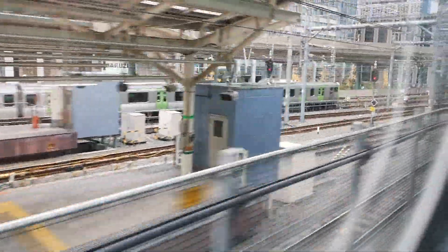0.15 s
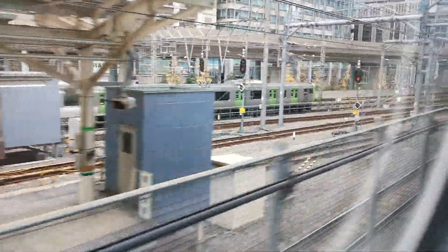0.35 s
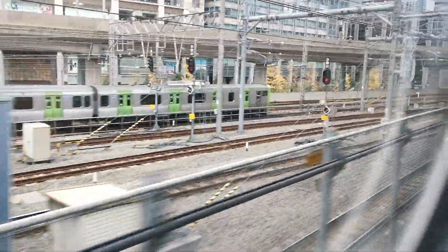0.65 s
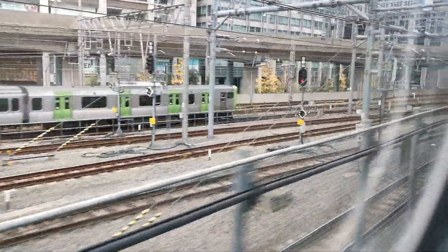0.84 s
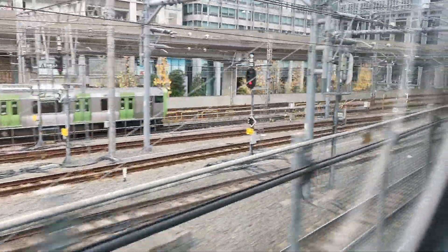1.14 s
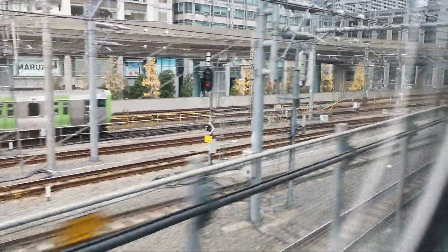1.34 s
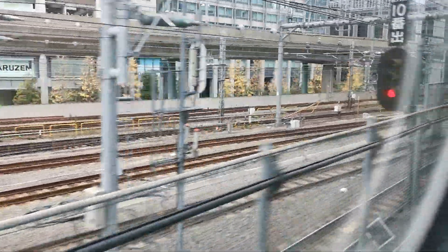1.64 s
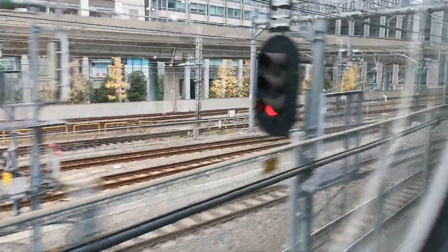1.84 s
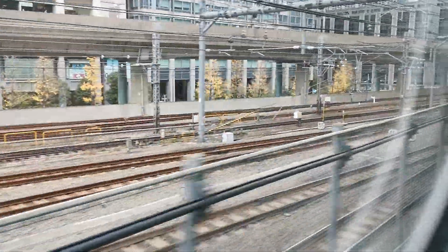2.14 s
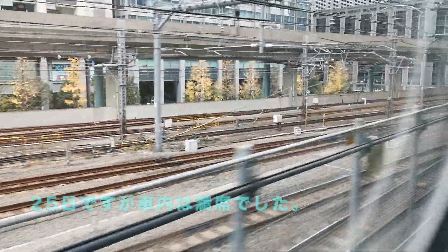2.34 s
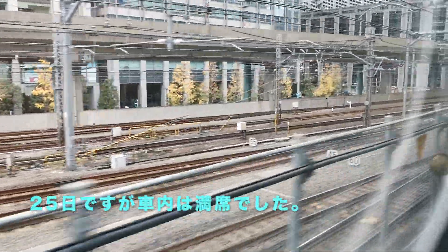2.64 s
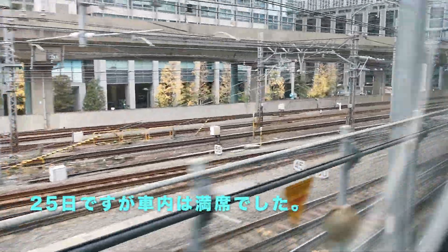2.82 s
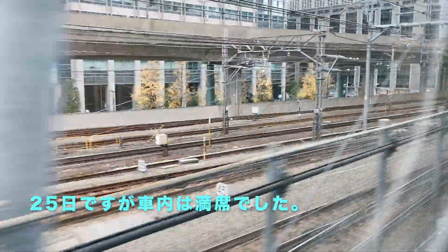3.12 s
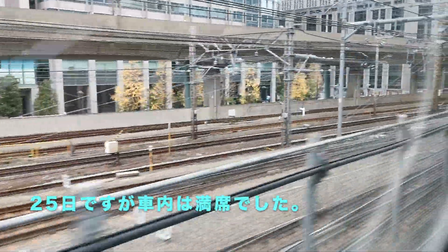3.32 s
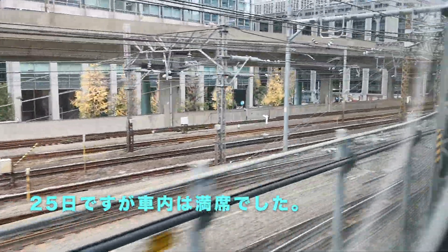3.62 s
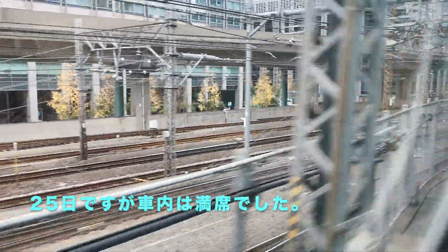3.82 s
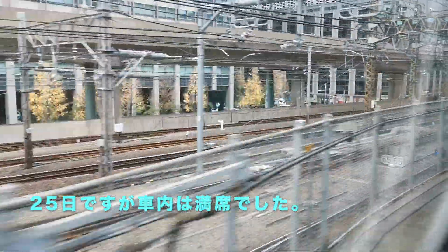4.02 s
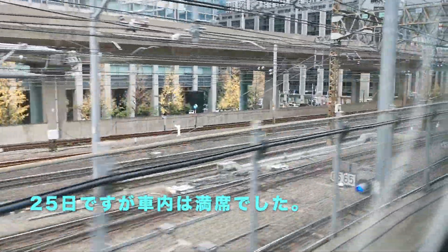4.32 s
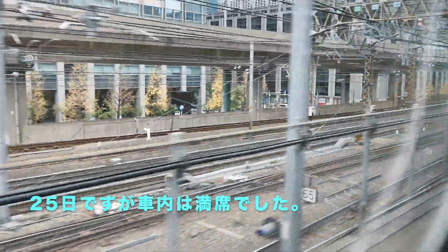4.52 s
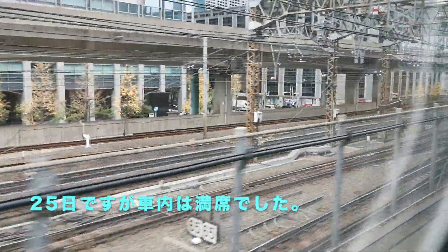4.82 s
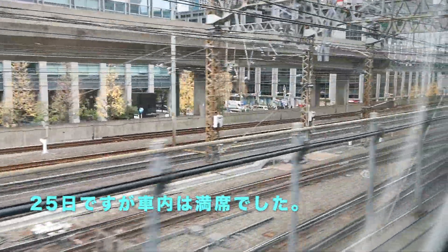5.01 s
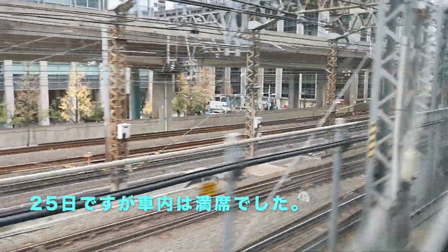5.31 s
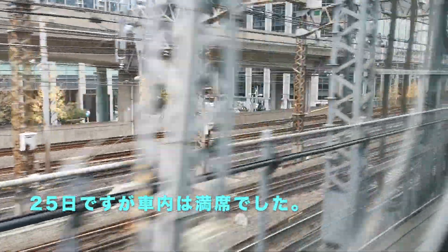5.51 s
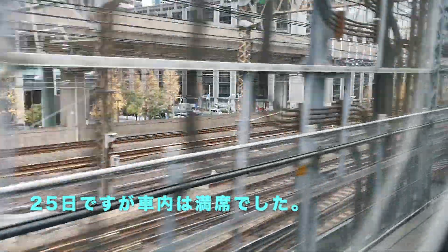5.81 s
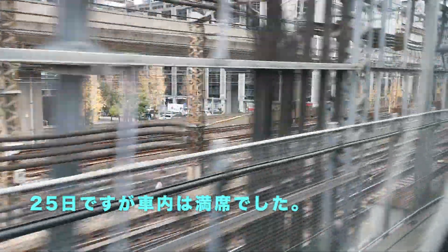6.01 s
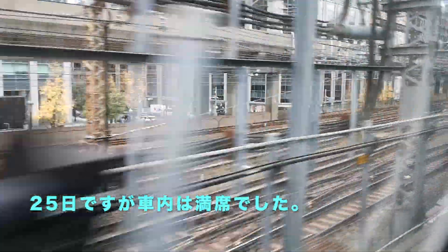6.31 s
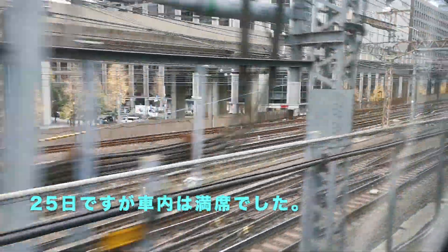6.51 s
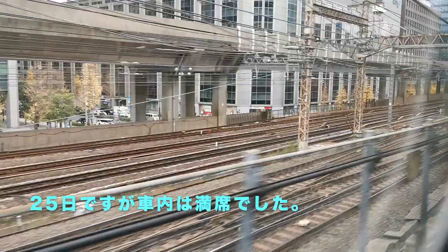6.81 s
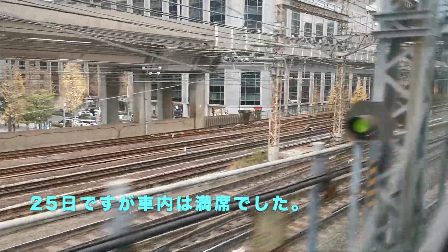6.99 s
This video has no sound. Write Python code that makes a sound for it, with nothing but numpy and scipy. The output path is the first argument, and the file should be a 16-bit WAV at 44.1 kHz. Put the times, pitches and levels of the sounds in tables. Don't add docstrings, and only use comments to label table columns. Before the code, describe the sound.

Inside a rolling train car, a low, swaying rumble and soft vent hiss run throughout. A jacket rustles and snaps busily close to a phone held at the window, then thins to small creases. Rail joints thump the floor in uneven clusters, strongest around three and five seconds. A small tap touches the microphone, a loose latch clacks, and wheels squeak thinly. The left side is muffled by a palm.

```python
import sys
import numpy as np
from scipy import signal
from scipy.fft import rfft, irfft
from scipy.io import wavfile
from scipy.ndimage import uniform_filter1d

SR = 44100
rng = np.random.default_rng(int(sys.argv[2]) if len(sys.argv) > 2 else 0)


def transcribe(u):
    v = np.clip(np.atleast_2d(u).T, -1, 1)
    q = np.round(v * 32767).astype(np.int16)
    wavfile.write(sys.argv[1], SR, q)


def amplitude_ratio(level_db):
    exponent = np.asarray(level_db, float) / 20
    return 10 ** exponent


N = 315315
TAPS = 4096


def table(points, hz):
    f, v = np.transpose(points)
    return np.interp(np.log(hz + 1), np.log(f), v)


def colour(x, points, read=amplitude_ratio):
    gain = read(table(points, np.arange(TAPS // 2 + 1) * SR / TAPS))
    cepstrum = irfft(np.log(gain))
    cepstrum[1:TAPS // 2] *= 2
    cepstrum[TAPS // 2 + 1:] = 0
    impulse = irfft(np.exp(rfft(cepstrum)))
    return signal.oaconvolve(x, impulse[None], axes=1)[:, :N]


def unit(x):
    return x / np.sqrt(np.mean(x ** 2))


def noise(shape):
    return unit(colour(rng.standard_normal((2, N)), shape))


def walk(rate):
    hold = int(SR / rate)
    steps = np.repeat(rng.standard_normal(N // hold + 1), hold)
    return uniform_filter1d(uniform_filter1d(steps, hold), hold)[:N]


def curve(rows):
    s, *columns = np.transpose(rows)
    return [np.interp(np.arange(N) / SR, s, c) for c in columns]


def add(out, s, x):
    i = int(s * SR)
    out[..., i:i + x.shape[-1]] += x[..., :N - i]


def apart(s, rise_s, fall_s):
    t = np.arange(N) / SR - s
    return np.where(t < 0, -t / max(rise_s, .01), t / max(fall_s, .01))


# [pitch_hz, level_db]
SWAY = [(10, -11.5), (25, 8.5), (55, 12.5), (80, 12), (120, -16.5), (600, -110)]
BOOM = [(30, -40.5), (65, -22), (90, -2.5), (125, 1), (175, -7), (235, -3), (290, -13), (400, -45),
        (1500, -110)]
ROAR = [(100, -47.5), (200, -27), (300, -0.5), (390, -8.5), (437, -5), (500, -9), (650, -12), (800, -13.5),
        (1000, -26.5), (1400, -56), (4000, -110)]
VENTS = [(200, -72), (600, 5), (900, 1.5), (1600, 1), (1900, -8.5), (2900, -11.5), (4500, -15.5),
         (5700, -17.5), (7700, -11), (9500, -27), (11500, -38), (15500, -43)]
# [peak_s, sway_rise_db, floor_rise_db, settle_s]
LURCHES = [(0.24, 10.5, 9, 0.052), (0.38, 3, 3, 0.13), (0.8, 2, 1, 0.31), (1.55, -1, 1, 0.079),
           (1.17, 4.5, -0.5, .08), (1.87, 4, 0.5, 0.12), (2.13, 10, 3, 0.032), (2.31, 5, -0.5, 0.055),
           (2.9, 1.5, 1, 0.31), (3.25, 7.5, 7, .18), (3.68, 5.5, 4, 0.084), (3.84, 3, 2, .06),
           (4.24, 5.5, 4, .12), (4.68, 4, 4.5, 0.075), (5.14, 6, -0.5, 0.042), (5.22, 1, 7, 0.089),
           (5.3, 14.5, 5, .07), (5.42, 4.5, 2.5, .08), (5.57, 9.5, 2.5, 0.059), (5.67, 9, 0.5, .09),
           (6.72, 5.5, 1.5, 0.15), (7.05, 5.5, 0, 0.083)]


def rolling():
    sway_rise_db, floor_rise_db = np.zeros(N), np.zeros(N)
    for s, sway_db, floor_db, settle_s in LURCHES:
        lurch = np.exp(-apart(s, 0.9 * settle_s, settle_s) ** 2)
        sway_rise_db += sway_db * lurch
        floor_rise_db += floor_db * lurch
    sway = noise(SWAY) * amplitude_ratio(-38.5 + sway_rise_db + 0.5 * walk(24))
    boom = noise(BOOM) * amplitude_ratio(-34.5 + floor_rise_db + 1.58 * walk(14))
    roar = noise(ROAR) * amplitude_ratio(-48 + 0.54 * floor_rise_db + 2.1 * walk(12))
    vents = noise(VENTS) * amplitude_ratio(-50.5 + 0.36 * walk(13))
    return sway + boom + roar + vents


# [peak_s, level_db, rise_s, fall_s]
STROKES = [(0.0, -40, .03, 0.033), (0.23, -47, 0.12, .06), (0.36, -42, .1, 0.26), (0.59, -43.5, 0.27, 0.18),
           (0.82, -50, 0.25, 0.19), (1.01, -46, 0.074, 0.046), (1.35, -57, 0.71, 0.6),
           (1.69, -52.5, 0.11, .2), (1.84, -36.5, 0.075, 0.099), (1.935, -41.5, 0.029, 0.066),
           (2.05, -51, 0.17, 0.14), (2.16, -41, 0.047, .1), (2.29, -30.5, .1, 0.05),
           (2.39, -40, 0.09, 0.14), (2.59, -45, 0.081, .04), (2.76, -44.5, .08, 0.074),
           (2.95, -65, 0.056, 0.068), (3.28, -61, 0.096, 0.45), (3.9, -53.5, 0.046, 0.14),
           (4.07, -53.5, 0.039, .35), (4.41, -55.5, 0.12, 0.034), (4.925, -56, 0.016, .13),
           (5.14, -54, 0.081, 0.14), (5.68, -58, 0.25, .3), (5.89, -54.5, .07, 0.17),
           (6.25, -55, 0.015, 0.029), (6.59, -56.5, 0.031, .15), (6.81, -50, .15, 0.12),
           (7.15, -59, .06, .1)]


def rubbing():
    power = amplitude_ratio(-64.5) ** 2
    for s, db, rise_s, fall_s in STROKES:
        power = power + amplitude_ratio(db - 10 * apart(s, rise_s, fall_s) ** 1.33) ** 2
    return 10 * np.log10(power)


# [start_s, level_db]
SNAPS = [(0.068, -49), (0.125, -44), (0.166, -41), (0.194, -37), (0.241, -34), (0.2952, -38), (0.325, -38),
         (0.361, -36), (0.434, -37.5), (0.494, -33), (0.606, -33), (0.651, -44), (0.694, -44), (0.899, -46),
         (0.981, -40), (1.0344, -41), (1.119, -45), (1.179, -46.5), (1.927, -31.5), (2.0353, -41),
         (2.144, -40), (2.19, -36), (2.584, -40), (2.718, -34), (2.936, -47), (2.983, -48), (3.1931, -48),
         (4.0434, -42), (5.12, -49)]
# [start_s, level_db, dull_db, length_s]
CREASES = [(0.858, -41, -5.5, 0.013), (0.958, -45.5, -3.5, 0.016), (1.3224, -45, -6, 0.033),
           (1.643, -44.5, -10, 0.02), (1.692, -46, -12, 0.037), (2.7, -44.5, -5, 0.013),
           (3.239, -45.5, -8, 0.033), (3.3049, -43, 2, 0.0098), (3.37, -49, -7, 0.019),
           (3.6247, -46, -11, 0.026), (3.669, -47, -8, 0.014), (3.761, -50.5, -6, 0.036),
           (3.9042, -32.5, -11.5, 0.0056), (4.237, -46, -11, 0.018), (4.4074, -43.5, -12, 0.01),
           (4.658, -51, -12, 0.014), (4.918, -48.5, -2.5, 0.031), (5.09, -50.5, -3, 0.024),
           (5.901, -31.5, -12.5, 0.029), (5.916, -44, -5, 0.028), (5.955, -43.5, -6, 0.028),
           (5.993, -52, 1.5, 0.034), (6.19, -54, 7, 0.036), (6.2415, -46, 0.5, 0.039),
           (6.598, -44.5, -9, 0.021), (6.976, -57.5, 6, 0.016)]


def folding():
    folds = []
    for s, db in SNAPS:
        folds.append((s, 1 / SR, 0.023, db, -57.5, -54, db - 12))
    for s, db, dull_db, length_s in CREASES:
        folds.append((s, 0.0006, length_s, db, db + dull_db + 4.5, db + dull_db + 4.5, -75))
    envelopes, t = np.zeros((4, N)), np.arange(SR // 5) / SR
    for s, attack_s, length_s, *parts_db in folds:
        tick = 0.8 * np.exp(-t / 0.0015)
        crinkle = 0.5 * np.exp(-(t / max(length_s, 0.003)) ** 2)
        attack = np.minimum((t + 1 / SR) / attack_s, 1) ** 2
        add(envelopes, s, np.outer(amplitude_ratio(np.array(parts_db)), (tick + crinkle) * attack))
    return envelopes


def slips():
    grains = amplitude_ratio(0.41 * rng.exponential(size=N)) * (rng.random(N) < 2500 / SR)
    return unit(signal.lfilter([1], [1, -.985], grains))


# [pitch_hz, level_db]
CLOTH = [(2000, -61.5), (3400, -11.5), (4400, -6), (4950, -7.5), (5600, -1), (6300, -7.5), (8000, -47)]
PORT = [(4500, -52.5), (6300, -9.5), (7100, -0.5), (7800, 3), (8500, -6.5), (9500, -16), (10500, -45),
        (14000, -78)]
POCKET = [(900, -58), (1900, -13), (2400, -10), (2650, -2.5), (2950, -8.5), (3500, -17), (6000, -57)]
FOLD = [(600, -69), (1600, -4), (2300, -1.5), (3500, -6.5), (5000, -10), (12000, -83)]
KNOCK = [(200, -44), (500, -3), (850, 4.5), (1500, -2.5), (2100, -12), (6000, -85)]
SHEEN = [(5000, -61.5), (8500, -6.5), (9500, -4), (11500, -13), (15500, -13.5)]
# [time_s, gain_db]
POCKET_MOUTH = [(0, -0.5), (0.5, -3.5), (0.8, 0), (1.05, 3), (1.2, 0), (1.6, -5), (1.66, 7), (1.85, 0.5),
                (2.3, 0), (2.55, 1), (2.8, 3.5), (3.0, 0.5), (4.4, 0.5), (5.5, 0.5), (6.3, 5.5),
                (7.15, -2.5)]


def cloth():
    rubbing_db = rubbing()
    snap, dull, knock, snap_sheen = folding()
    bright = np.hypot(snap, amplitude_ratio(rubbing_db + 0.5))
    pocket = amplitude_ratio(-50 + 0.85 * (rubbing_db + 41) + curve(POCKET_MOUTH)[0])
    pocket = np.hypot(pocket, dull * amplitude_ratio(-4.5))
    sheen = np.hypot(snap_sheen, amplitude_ratio(rubbing_db - 12))
    layers = [(bright * amplitude_ratio(-5.5), CLOTH), (bright, PORT), (pocket, POCKET),
              (dull, FOLD), (knock, KNOCK), (sheen, SHEEN)]
    out = np.zeros((2, N))
    for envelope, shape in layers:
        out += envelope * amplitude_ratio(1.6 * walk(25)) * slips() * noise(shape)
    return out


# [hit_s, level_db, panel_hz, rattle_db, swell_s]
THUMPS = [(0.149, -20, 179, -25, 0.02), (1.325, -33.5, 242, -10, 0.014), (2.048, -26.5, 110, -26, 0.019),
          (2.217, -19.5, 121.5, -25, 0.017), (3.064, -11.5, 142, -26, 0.022), (3.091, -9, 132, -43, 0.019),
          (3.2, -15.5, 149.5, -25.5, 0.03), (3.291, -20, 99.6, -23, 0.014), (3.538, -22, 115.4, -28, 0.024),
          (3.656, -22, 134.8, -42, 0.032), (4.222, -22, 93.2, -43, 0.029),
          (5.013, -24.5, 117.4, -29, 0.019), (5.097, -8.5, 136.3, -31.5, 0.025),
          (5.223, -15.5, 153.6, -39, 0.024), (5.274, -14, 114.7, -31.5, 0.017),
          (5.314, -18.5, 205, -46, 0.012), (5.848, -24.5, 119.7, -25, 0.014), (6.167, -25, 118, -24, 0.023),
          (6.528, -23, 130.5, -17.5, 0.035), (6.68, -24, 123, -21, 0.026),
          (6.975, -29.5, 234.8, -18.5, 0.037)]


def thumps():
    boom, shudder, shake = np.zeros((3, N))
    t = np.arange(SR // 2) / SR
    for s, db, hz, rattle_db, swell_s in THUMPS:
        phase = 2 * np.pi * rng.random(2)
        x = t / max(swell_s, .005)
        swell = (x * np.exp(1 - x)) ** 2.16
        turn = 2 * np.pi * hz * (t - 0.52 * t ** 2)
        panel = np.sin(turn + phase[0]) + 0.32 * np.sin(1.47 * turn + phase[1])
        start_s = s - 0.012
        add(boom, start_s, amplitude_ratio(db - 3.5) * swell * panel)
        add(shudder, start_s, amplitude_ratio(db - 15) * np.minimum(x, 1) * np.exp(-t / 0.088))
        add(shake, start_s, amplitude_ratio(db + rattle_db) * swell ** 0.27)
    return boom + shudder * noise(BOOM) + 1.2 * shake * noise(ROAR)


# [time_s, pitch_hz, level_db]
SQUEAKS = [
    [(5.525, 3705, -69), (5.59, 3725, -63), (5.61, 3735, -69), (5.632, 3750, -61), (5.655, 3730, -70),
     (5.68, 3730, -76)],
    [(5.62, 3760, -66), (5.645, 3840, -58), (5.685, 3800, -65), (5.72, 3770, -78), (5.75, 3760, -72),
     (5.83, 3800, -80)],
    [(4.115, 4730, -75), (4.142, 4715, -70), (4.17, 4720, -78)],
]


def squeaks():
    out, t = np.zeros(N), np.arange(N) / SR
    for rows in SQUEAKS:
        hz, db = curve(rows)
        edge = np.clip(np.minimum(t - rows[0][0], rows[-1][0] - t) / 0.016, 0, 1)
        level = amplitude_ratio(db + 11.5 + 3.5 * walk(70))
        turn = 2 * np.pi * np.cumsum(hz + 22 * walk(150)) / SR
        out += edge * level * np.sin(turn)
    return out


# [pitch_hz, level_db, t60_s]
LATCH = [(963, 12, 0.059), (1120, -5, 0.072), (1440, -7, 0.059), (1545, -0.5, 0.15), (1735, -3, 0.067),
         (1930, -6, 0.082), (2264, -8.5, 0.057)]


def latch():
    out, t = np.zeros(N), np.arange(SR // 3) / SR
    for hz, db, t60 in LATCH:
        attack = np.minimum(t / 0.0029, 1)
        ring = amplitude_ratio(-39 + db - 60 * t / t60) * np.sin(2 * np.pi * hz * t) * attack
        mode_s = 5.183 + (hz - 900) * 1.7e-5
        for delay_s in 0.007 * np.arange(3) * rng.random(3):
            add(out, mode_s + delay_s, ring)
    return out * (1 + 0.5 * walk(500))


def finger_tap(left):
    t = np.arange(SR // 50) / SR
    add(left, 2.7185, amplitude_ratio(-16) * np.sin(2 * np.pi * 330 * t) * np.exp(-t / 0.0018))


# [pitch_hz, gain_db]
PALM = [(60, 0), (200, -1), (400, -2), (700, -1), (950, -7), (1400, -9), (1800, -3), (2400, 1.8),
        (3000, 0.1), (4000, -10), (5500, -24), (7500, -29), (9000, -29), (15000, -25)]
LIKENESS = [(30, 0.87), (120, 0.95), (250, 1), (500, 1), (700, 0.84), (900, 1), (1700, 0.51), (2100, 0.25),
            (16000, 0.28)]


def covered_port(shared, other):
    late = np.roll(shared, int(0.00012 * SR), axis=1)
    alike = colour(late, LIKENESS, lambda c: np.sqrt(np.clip(c, .01, .99)))
    unlike = colour(other, LIKENESS, lambda c: np.sqrt(1 - np.clip(c, .01, .99)))
    return colour(alike + unlike, PALM)


def scene():
    cabin = rolling() + cloth() + thumps() + squeaks() + latch()
    shared, other = np.split(cabin, 2)
    left = covered_port(shared, other)
    finger_tap(left)
    return np.vstack([left, shared])


def band_limit(x):
    return signal.sosfilt(signal.butter(12, 15910, fs=SR, output="sos"), x)


def record(dry):
    low_pass = signal.ellip(10, 0.2, 60, 15350, fs=SR, output="sos")
    return band_limit(signal.sosfilt(low_pass, dry))


dry = scene()
out = record(dry)
transcribe(out)
```